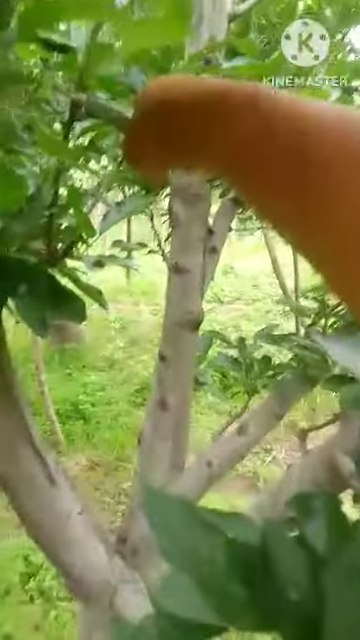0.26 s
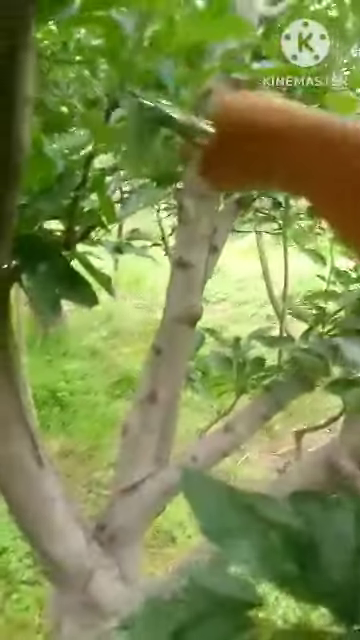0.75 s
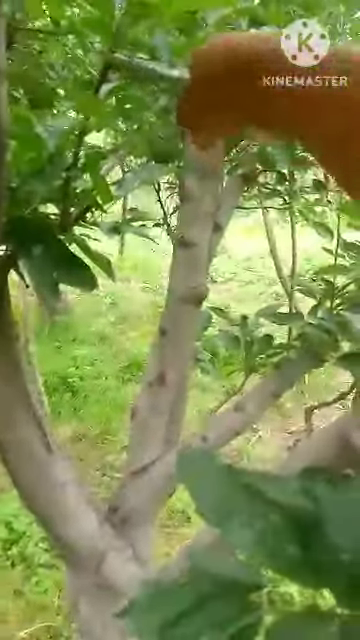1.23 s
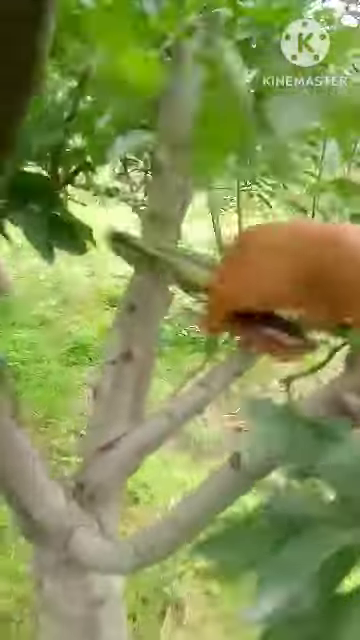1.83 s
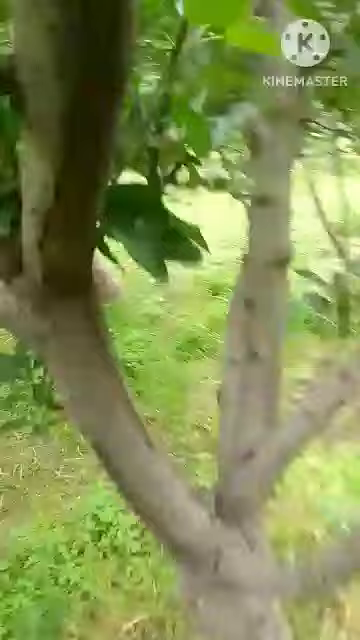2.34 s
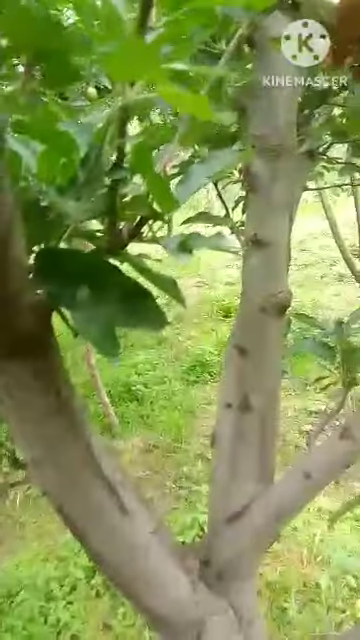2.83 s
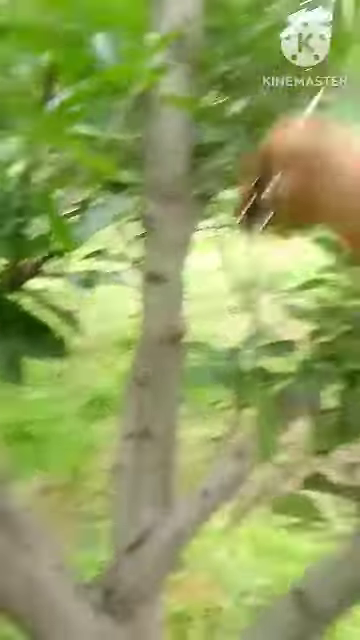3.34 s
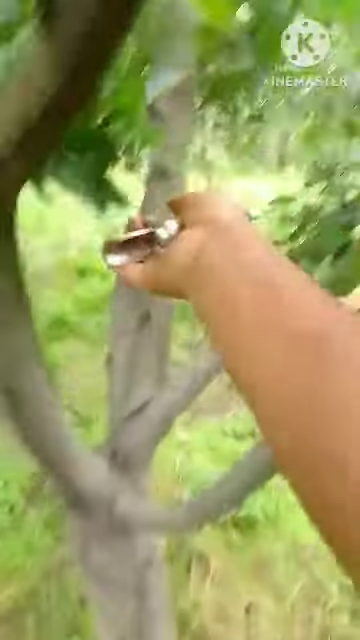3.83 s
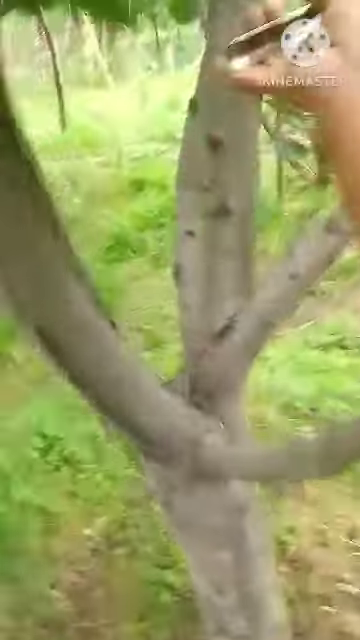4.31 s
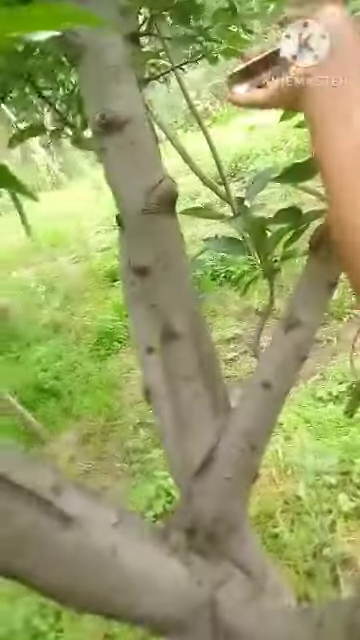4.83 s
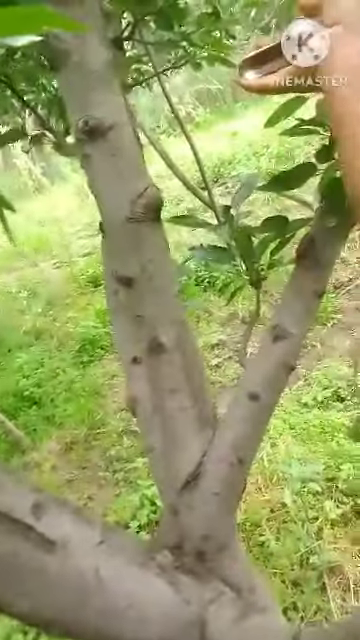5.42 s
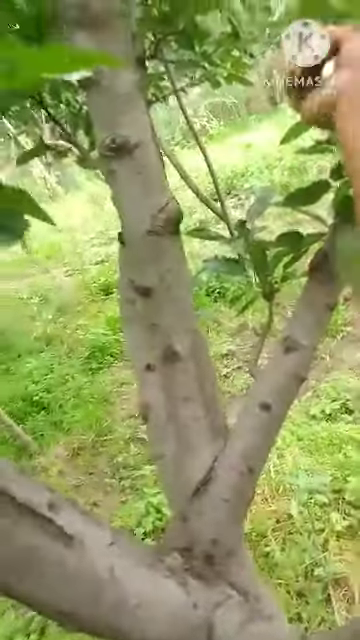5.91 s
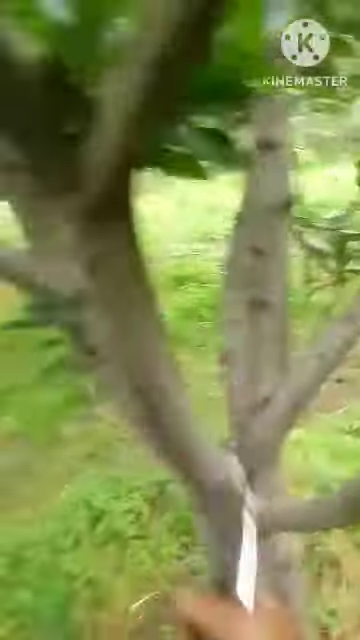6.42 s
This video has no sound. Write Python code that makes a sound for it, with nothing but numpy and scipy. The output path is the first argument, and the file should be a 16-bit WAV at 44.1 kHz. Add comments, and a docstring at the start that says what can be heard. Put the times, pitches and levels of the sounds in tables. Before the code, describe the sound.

In a quiet orchard, close to the microphone, leaves rustle and twigs flick as hand pruning shears cut three shoots. Each gives a brief creak, a sharp snap with a short steel ring, and a gritty rasp as it drags free. The first two cuts come fairly close together, the third after a pause. The blades scrape thinly open after the second and judder after the last, over faint outdoor air.

```python
"""In an orchard, with the microphone close by, hand pruning shears cut three leafy shoots.
Each shoot creaks as torn fibres tick, then snaps: noise splinters, ringing blade modes and a knock of wood.
The shoot drags free with a gritty rasp; the blades scrape open on fine grains, and judder after the last cut.
Around the arm, grains of rustle swell with each sweep; twig flicks and judder are clicks with decaying noise.
Beyond lie shaped-noise air, a distant hiss, a faint wavering hum, and puffs and flutter of low noise."""
import sys
import numpy as np
from scipy import signal
from scipy.fft import rfft, irfft
from scipy.io import wavfile

SR = 44100
rng = np.random.default_rng(int(sys.argv[2]) if len(sys.argv) > 2 else 0)


def dump_mix(stems):
    """Bounce the given channels to the path in sys.argv[1] as a 16-bit WAV at rate SR."""
    frames = np.atleast_2d(stems).T  # one column per channel
    limited = np.clip(frames, -1, 1)  # hard clip at full scale
    pcm = np.round(limited * 32767).astype(np.int16)
    wavfile.write(sys.argv[1], SR, pcm)


N = 293706
TIME = np.arange(N) / SR  # [s]


def amp(db):
    """Decibels to gain."""
    return 10 ** (np.asarray(db) / 20)


def unit(x):
    """Scales to rms 1."""
    return x / np.sqrt(np.mean(x ** 2) + 1e-20)


def level(rows):
    """Gain at every sample, interpolated in dB from (time [s], level [dB]) rows."""
    return amp(np.interp(TIME, *np.transpose(rows)))


def add(mix, start, sound):
    """Mixes a sound in at start [s], cut off at the end of the mix."""
    part = mix[round(start * SR):][:len(sound)]
    part += sound[:len(part)]


def colour(x, points):
    """Filters x by a curve of (frequency [Hz], relative level [dB]) points, then scales to rms 1."""
    hz, db = np.transpose(points)
    f = np.fft.rfftfreq(len(x), 1 / SR)
    gain = amp(np.interp(np.log(f + 1), np.log(hz), db))
    return unit(irfft(rfft(x) * gain, len(x)))


def band(hz, width_hz):
    """Noise in one resonance, down to half amplitude width_hz from its centre, at rms 1."""
    f = np.fft.rfftfreq(N, 1 / SR)
    resonance = 1 / (1 + ((f - hz) / width_hz) ** 2)
    return unit(irfft(rfft(rng.standard_normal(N)) * resonance, N))


def waver(rate_hz):
    """Slow random drift, at rms 1."""
    return band(0, rate_hz)


def grains(per_s, spread_db):
    """A random train of tiny clicks, a few of them much larger than the rest, at rms 1."""
    size = amp(spread_db * np.minimum(rng.exponential(1, N), 4))
    sign = rng.choice([-1, 1], N)
    present = rng.random(N) < per_s / SR
    return unit(size * sign * present)


def burst(t, hz, half_s):
    """A few cycles swelling and fading around time zero."""
    return np.exp(-(t / half_s) ** 2) * np.sin(2 * np.pi * hz * t)


def stroke(start, length, sag_db, rise_s, t60):
    """Gain of one movement: it sets in, sags over its length, then dies away (a negative sag swells)."""
    t = np.maximum(TIME - start, 0)
    sag = -sag_db * np.minimum(t / length, 1)
    decay = -60 * np.maximum(t - length, 0) / t60
    return np.minimum(t / rise_s, 1) * amp(sag + decay)


def scatter(x, t60, delay, points):
    """Many faint reflections of unit energy that build up over delay [s] and die away."""
    t = np.arange(SR) / SR
    build_up = 1 - np.exp(-(t / delay) ** 2)
    tail = colour(rng.standard_normal(SR), points) * amp(-60 * t / t60) * build_up
    return signal.fftconvolve(x, tail / np.linalg.norm(tail))[:N]


# colour of the still orchard air: (frequency [Hz], relative level [dB])
AIR_COLOUR = [(15, -36.5), (25, 2), (44, -2.5), (160, -4), (378, -10.5), (567, -7), (722, -13),
              (1080, -14.5), (1340, -10.5), (1660, -15.5), (2920, -19.5), (4620, -22.5), (7100, -34.5),
              (14300, -40), (15500, -42.5)]
# hiss from far off: (time [s], upper band level [dB], lower band level [dB])
DISTANT_HISS = [(0, -62, -77), (1.0, -62.5, -79), (2.2, -62, -77), (3.1, -63.5, -66.5), (3.35, -72.5, -82),
                (4.3, -70.5, -86), (5.2, -66.5, -72), (5.9, -70, -69), (6.66, -65, -76)]
# soft puffs of air on the microphone: (start [s], length [s], level [dB])
MICROPHONE_PUFFS = [(1.93, 0.31, -62.5), (6.374, 0.19, -61)]
# puffs of a brief low flutter: (start [s], length [s], level [dB])
LOW_FLUTTER = [(3.333, 0.027, -61), (3.39, .05, -60), (3.469, 0.042, -58.5), (3.514, .04, -59)]
# faint distant hum: (mean frequency [Hz], level [dB], start [s], length [s], sag [dB])
DISTANT_HUM = [(180, -63.5, 5.72, 0.93, 3), (615, -71, 5.66, .28, -6.5)]


def outdoors(air_db=-62.5):
    """Shaped noise for still air, resonant noise for hiss, puffs and flutter, wavering sines for hum."""
    air = amp(air_db) * colour(rng.standard_normal(N), AIR_COLOUR) * amp(0.5 * waver(1.6))

    s, upper_db, lower_db = np.transpose(DISTANT_HISS)
    hiss = amp(np.interp(TIME, s, upper_db)) * band(1260, 290)
    hiss += amp(np.interp(TIME, s, lower_db)) * band(710, 170)

    puff_gain = sum(amp(db) * stroke(s, length, 0, rise_s=0.049, t60=0.38)
                    for s, length, db in MICROPHONE_PUFFS)
    flutter_gain = sum(amp(db) * stroke(s, length, 0, rise_s=0.015, t60=0.11)
                       for s, length, db in LOW_FLUTTER)

    hum = np.zeros(N)
    for hz, db, s, length, sag_db in DISTANT_HUM:
        phase = 2 * np.pi * np.cumsum(hz * (1 + 0.0109 * waver(9.1))) / SR
        hum += amp(db) * stroke(s, length, sag_db, rise_s=0.11, t60=0.5) * np.sin(phase)
    return air + hiss + puff_gain * band(42, 63) + flutter_gain * band(265, 55) + hum


# leaves stirring by themselves, fainter once the microphone has left them:
# (time [s], level before the trims of rustle and crackle [dB])
LEAF_STIR = [(0, -64), (1.6, -63.5), (3.1, -61.5), (3.4, -67), (5.3, -66.5), (6.66, -68)]
# the arm sweeps through leaves close by, levels before the layer trims:
# (start [s], length [s], rustle level [dB], close brushing level [dB])
ARM_SWEEPS = [(1.60, 0.095, -55, -82), (1.697, 0.2, -60, -66), (1.994, 0.22, -59, -71),
              (2.12, 0.21, -55, -66), (2.33, 0.45, -63, -73.5), (2.587, .42, -63.5, -71.5),
              (3.15, 0.59, -65.5, -73), (3.49, 0.35, -54.5, -66.5), (3.97, 0.86, -66, -84),
              (4.75, .05, -73, -78), (6.0, 0.35, -58.5, -73), (6.348, 0.46, -57, -82),
              (6.54, 0.25, -56, -87)]
# colour of the rustle and crackle of leaves: (frequency [Hz], relative level [dB])
LEAF_COLOUR = [(40, -15.5), (150, 1.5), (400, 6), (800, -4.5), (1600, 1), (3200, 2.5), (4700, -0.5),
               (5800, -11), (8500, -17.5), (11000, -27.5)]
# colour of the fizz from the nearest leaves: (frequency [Hz], relative level [dB])
BRUSH_COLOUR = [(1500, -24), (4000, 8), (7000, 5.5), (10000, -4), (15000, -4)]


def foliage(crackle_db=-5, resting_brush_db=-92, sag_db=7, rise_s=0.043, t60=0.45):
    """Leaves stir, louder as the arm sweeps through: fine grains, crackle, and a soft fizz from the nearest."""
    rustle_power, brush_power = level(LEAF_STIR) ** 2, amp(resting_brush_db) ** 2
    for s, length, rustle_db, brush_db in ARM_SWEEPS:
        push = stroke(s, length, sag_db, rise_s, t60)
        rustle_power = rustle_power + (amp(rustle_db) * push) ** 2
        # the fizz rises and falls faster than the rustle
        brush_power = brush_power + (amp(brush_db) * push ** 1.4) ** 2
    motion = np.sqrt(rustle_power) * amp(2.0 * waver(21.9))
    rustle = colour(grains(per_s=4500, spread_db=3.0), LEAF_COLOUR)

    t = np.arange(SR // 50) / SR
    crinkle = colour(rng.standard_normal(len(t)), LEAF_COLOUR) * amp(-60 * t / 0.022)
    crackle = unit(signal.oaconvolve(grains(per_s=110, spread_db=2.0), crinkle)[:N])

    fizz = colour(grains(per_s=4500, spread_db=4.0), BRUSH_COLOUR)
    brush = fizz * np.sqrt(brush_power) * amp(1.2 * waver(25))
    return motion * (amp(-1.0) * rustle + amp(crackle_db) * crackle) + amp(5.0) * brush


# twigs and leaves flicking against the tool and the arm;
# the last five, from 6.074 s, are the shears juddering as they spring open:
# (time [s], level of the noise at its onset [dB], pitch [Hz], width [octaves], t60 [s])
FLICKS_AND_JUDDER = [(0.086, -46.5, 500, 1.7, 0.054), (0.167, -47.5, 2800, 1, 0.027),
                     (0.228, -54, 3730, 0.88, 0.015), (0.549, -48, 3500, 0.75, 0.013),
                     (0.634, -45, 2810, 1.03, 0.019), (1.142, -51.5, 3780, 0.58, 0.047),
                     (1.421, -41.5, 2470, 0.51, 0.0099), (1.458, -42.5, 1590, 1.4, 0.027),
                     (1.626, -52, 4220, 0.83, 0.027), (1.888, -57, 4500, 1.7, .04),
                     (2.011, -45.5, 1580, 1.9, 0.024), (2.062, -50, 3650, 0.83, 0.036),
                     (2.165, -51, 1560, 0.39, 0.086), (2.273, -49, 1400, 3.5, 0.017),
                     (2.333, -43, 1280, 0.6, 0.077), (2.364, -46.5, 1420, 0.63, 0.035),
                     (2.645, -47, 1280, 0.83, 0.055), (2.843, -51.5, 6940, 0.56, 0.026),
                     (2.868, -55, 8800, 1.4, 0.023), (2.919, -45, 3200, 1.04, 0.02),
                     (3.521, -45.5, 900, 3.9, 0.044), (3.607, -43, 1500, 1.9, 0.022),
                     (3.759, -43, 3450, 0.38, 0.013), (4.628, -42.5, 2050, 1.66, 0.022),
                     (4.787, -56, 1380, 1.7, 0.078), (4.808, -51.5, 1300, 1.7, 0.056),
                     (5.415, -43.5, 1320, 1.7, 0.023), (5.73, -47.5, 2420, 0.68, 0.022),
                     (6.074, -42, 1700, 1.2, .06), (6.097, -43, 2100, 1.6, 0.028),
                     (6.118, -41.5, 1290, 0.57, 0.06), (6.133, -42, 1330, 2.3, 0.042),
                     (6.18, -45, 1650, 1.8, 0.026)]


def flicks_and_judder(click_db=7):
    """Short dry flicks and the judder of the shears: a sharp contact, then noise dying in its own band."""
    out, t = np.zeros(N), np.arange(SR // 8) / SR
    for s, db, hz, octaves, t60 in FLICKS_AND_JUDDER:
        edges = np.clip(hz * 2 ** (np.array([-0.5, 0.5]) * octaves), 50, SR / 2.2)
        bandpass = signal.butter(2, edges, "band", fs=SR, output="sos")
        body = signal.sosfilt(bandpass, rng.standard_normal(len(t)))
        dying_noise = unit(body) * amp(-60 * t / t60)
        # a wider band dies in fewer cycles
        click = np.sin(2 * np.pi * hz * t) * np.exp(-1.1 * hz * octaves * t)
        add(out, s, amp(db) * (dying_noise + amp(click_db) * click))
    return out


# the blades slide open: (start [s], length [s], level [dB], sag [dB])
BLADE_OPENINGS = [(3.301, 0.12, -68.5, -0.5), (3.516, 0.13, -60.5, -4), (3.643, 0.25, -59.5, 21),
                  (6.077, 0.087, -61, 1.5)]
# colour of steel rubbing on steel: (frequency [Hz], relative level [dB])
SCRAPE_COLOUR = [(2000, -26.5), (4100, -2), (4650, -19), (5500, -6), (7800, -23), (8600, 3), (9150, 9),
                 (10000, -19.5), (13000, -18.5), (16000, -29)]


def openings(rise_s=0.025, t60=0.12):
    """Blade rubs on blade with a thin, high rasp of dense grains."""
    rub = sum(amp(db) * stroke(s, length, sag_db, rise_s, t60)
              for s, length, db, sag_db in BLADE_OPENINGS)
    return rub * colour(grains(per_s=7200, spread_db=7.5), SCRAPE_COLOUR)


# the jaws squeeze a shoot, part it, and it slips free; squeeze levels are before the blade and wood trims:
# (parting time [s], squeeze length [s], squeeze level at parting [dB],
#  drag level [dB], drag length [s], drag sag [dB])
SHOOT_CUTS = [(1.709, 0.048, -37, -48.5, 0.2, 10.5), (3.256, 0.028, -39.5, -46, 0.2, 25.5),
              (6.0188, 0.049, -43, -45.5, 0.12, 6)]
# colour of the shoot dragging free of jaws and leaves, one list for each cut:
# (frequency [Hz], relative level [dB])
DRAG_COLOURS = [
    [(180, -37), (300, -23), (452, -7), (498, -22), (577, -9), (714, -33), (928, -10.5), (2070, -14.5),
     (2650, -3), (3220, -13.5), (3860, -10), (4930, -16.5), (5260, -23.5), (15000, -44)],
    [(290, -43), (500, -18.5), (655, -28), (962, -37), (1020, -36), (1230, -6), (2050, 7), (2760, -9),
     (3090, -22.5), (3670, 1.5), (5090, -1.5), (6390, -17.5), (8860, -20), (15000, -36)],
    [(120, -48), (200, -7), (376, -7), (789, -3), (1220, -4), (1660, -11), (1880, 6), (2090, -23),
     (2950, 0), (3410, -29), (4640, 4.5), (5970, -43), (9050, -19), (10300, -29), (12700, -25),
     (13200, -15), (13700, -25), (15000, -29)],
]


def drags(slip_db=3.0, rise_s=0.01, t60=0.24):
    """From the moment of the cut, bark slips over the steel in gritty clumps."""
    rasp = np.zeros(N)
    for (s, _, _, db, length, sag_db), tone in zip(SHOOT_CUTS, DRAG_COLOURS):
        grit = colour(grains(per_s=1700, spread_db=2.6), tone)
        rasp += amp(db) * stroke(s, length, sag_db, rise_s, t60) * grit
    return rasp * amp(slip_db * waver(70))


# ringing modes of the shears; the bite point sets how hard each is struck:
# (frequency [Hz], t60 [s], relative level in first, second and third cut [dB])
SHEAR_MODES = [(1896, 0.034, -31.5, -25, -34), (1880, 0.052, -20.5, -38, -24),
               (2382, 0.013, -9.5, -30.5, -10), (2620, 0.017, -15, -11.5, -23),
               (2833, 0.017, -13.5, -21.5, -11.5), (3670, 0.009, -18, -9.5, -43),
               (3980, 0.0184, -40, -21, -36), (4510, 0.012, -60, -13, -15), (4950, 0.01, -53, -13.5, -33),
               (4880, .02, -24.5, -11, -35), (5510, 0.009, -58, -16, -16), (6660, 0.017, -27, -28, -20),
               (8680, 0.0096, -44, -21.5, -16.5)]


def steel(cut, rise=0.000079, low_hz=1500):
    """Ring of the shears after a unit blow in the given cut; narrow blades radiate no bass."""
    t = np.arange(SR // 10) / SR
    modes = sum(amp(db[cut] - 60 * t / t60) * np.sin(2 * np.pi * hz * t)
                for hz, t60, *db in SHEAR_MODES)
    low_cut = signal.butter(4, low_hz, "high", fs=SR, output="sos")
    return signal.sosfilt(low_cut, modes * (1 - np.exp(-t / rise)))


def squeeze(wood_db=-6, blades_db=-5.5, rise_s=0.014, t60=0.12, soft_hz=5200):
    """Tearing fibres tick in the wood and softly against the blades, harder until the shoot parts."""
    grip_db_per_s = 165.5  # the creak swells as the hand tightens
    tear_db, tear_rise_s, tear_t60 = -23, 0.0035, 0.055  # the last fibres part all at once
    wood_colour = [(100, -26), (450, -18), (850, -24.5), (1500, -17.0), (2800, -3.5),
                   (5000, 2.5), (6000, -19.0), (9000, -21.5), (15000, -30)]
    out = np.zeros(N)
    for cut, (s, length, db, *_) in enumerate(SHOOT_CUTS):
        swell_db = grip_db_per_s * length
        creak = amp(db - swell_db) * stroke(s - length, length, -swell_db, rise_s, t60)
        tear = amp(tear_db) * stroke(s - tear_rise_s, tear_rise_s, 0, tear_rise_s, tear_t60)
        force = creak + tear
        ticks = grains(per_s=2300, spread_db=4.0)
        soften = signal.butter(2, soft_hz, fs=SR, output="sos")
        ring = signal.sosfilt(soften, steel(cut))
        blades = signal.oaconvolve(ticks * force, ring / np.linalg.norm(ring))[:N]
        wood = force * colour(ticks, wood_colour)
        out += amp(blades_db) * blades + amp(wood_db) * wood
    return out


# fibres crack, the shoot gives way and the jaws slam shut:
# (time [s], level of crack and blow [dB], pitch of the crack [Hz])
CRACKS = [(1.6793, -30, 3460), (1.6962, -28, 2880), (1.7089, -16.5, 2860), (1.7121, -3.5, 2500),
          (1.7142, -12.5, 2330), (1.7562, -33, 3440), (3.1910, -33.5, 4120), (3.1961, -26.5, 4600),
          (3.212, -37, 4800), (3.2184, -31, 4900), (3.2510, -28, 4670), (3.2580, -16.5, 3730),
          (3.2598, -5.5, 4100), (3.2612, -13.5, 2470), (3.2629, -19.5, 2105), (5.999, -39, 3000),
          (6.0199, -16.5, 2730), (6.0213, -14.5, 4340), (6.0220, -15, 2430), (6.0425, -31, 2430)]
# the severed wood recoils with a dull knock: (time [s], level [dB], pitch [Hz])
WOOD_KNOCKS = [(1.7126, -32.5, 370), (3.2605, -35, 442), (6.0222, -35, 500)]
# modes of that knock: (multiple of its pitch [ratio], relative level [dB], half-length [s])
KNOCK_MODES = [(0.439, -17, .0038), (1, 0, .0025), (1.55, -16.5, .0025)]


def snaps(splinter_db=-28, splinter_t60=0.015, crack_cycles=1.7):
    """Each snap is a crack and a spray of splinters; it sets the steel ringing and the wood recoils."""
    splinter_colour = [(100, -32), (900, -14.5), (1600, 5.0), (5000, -7), (9000, -3.5), (15000, -44)]
    out, t = np.zeros(N), np.arange(SR // 10) / SR
    lead = 0.02  # [s], room for a burst to swell before its centre
    for s, db, hz in CRACKS:
        # a crack swells and fades within crack_cycles on either side
        add(out, s - lead, amp(db) * burst(t - lead, hz, crack_cycles / hz))
        splinters = colour(rng.standard_normal(len(t)), splinter_colour)
        spray = amp(splinter_db - 60 * t / splinter_t60) * splinters
        nearest_cut = np.argmin([abs(cut[0] - s) for cut in SHOOT_CUTS])
        add(out, s, amp(db) * (spray + steel(nearest_cut)))
    for s, db, hz in WOOD_KNOCKS:
        knock = sum(amp(db + mode_db) * burst(t - lead, hz * ratio, half_s)
                    for ratio, mode_db, half_s in KNOCK_MODES)
        add(out, s - lead, knock)
    return out


def scene():
    """The close sounds, thrown back by the near branches and by the trees beyond, over the orchard."""
    close = snaps() + squeeze() + drags() + openings() + flicks_and_judder()
    branches = scatter(close, t60=0.048, delay=0.0012,
                       points=[(300, 6.0), (2000, 4), (5000, -12.5), (15000, -5.5)])
    trees = scatter(close, t60=0.49, delay=0.0073,
                    points=[(200, -7), (1200, -1.0), (2500, -1.5), (4500, -0.5), (9000, 4), (15000, 3.5)])
    reflections = amp(-16.5) * branches + amp(-18.5) * trees
    return (close + reflections + foliage() + outdoors())[None]


def record(dry, low_cut_hz=28, edge_hz=15600):
    """The microphone's low cut and the recorder's band limit."""
    low_cut = signal.butter(2, low_cut_hz, "high", fs=SR, output="sos")
    thin = signal.sosfilt(low_cut, dry)
    band_limit = signal.firwin(511, edge_hz, window=("kaiser", 9), fs=SR)
    return signal.oaconvolve(thin, band_limit[None], "same")


dry = scene()
out = record(dry)
dump_mix(out)
```